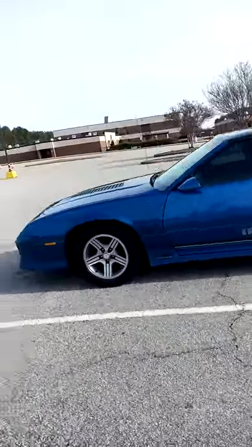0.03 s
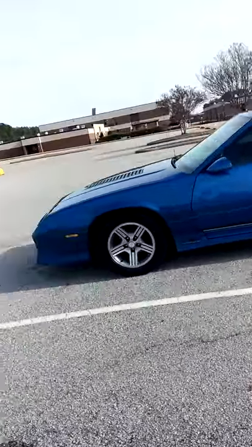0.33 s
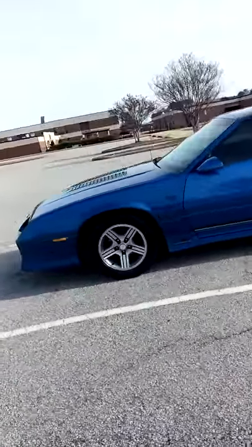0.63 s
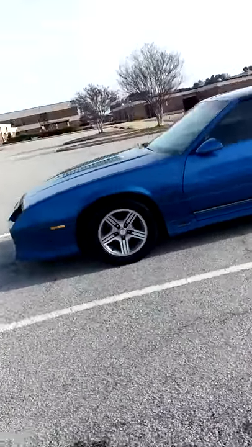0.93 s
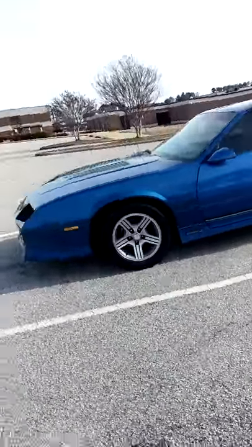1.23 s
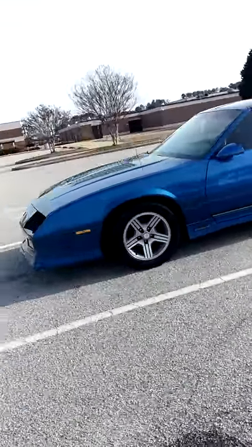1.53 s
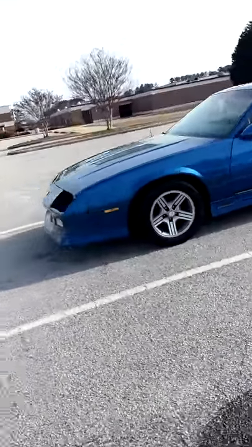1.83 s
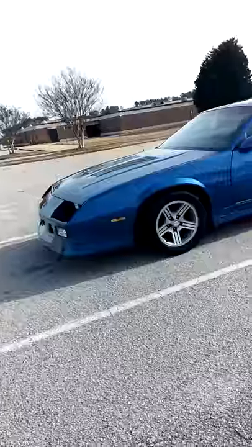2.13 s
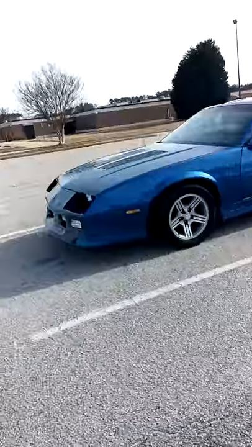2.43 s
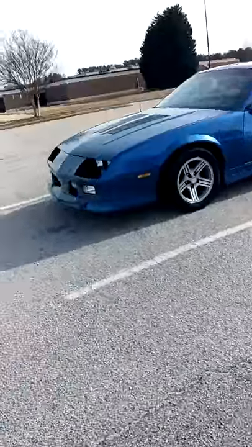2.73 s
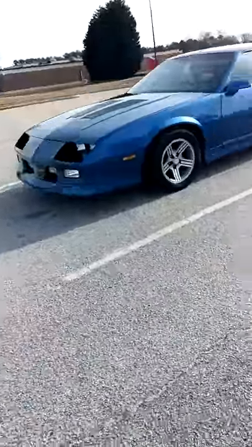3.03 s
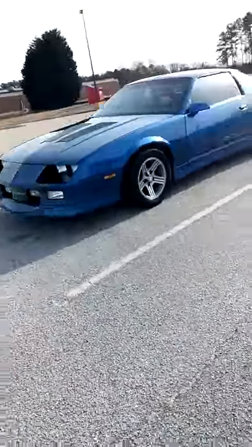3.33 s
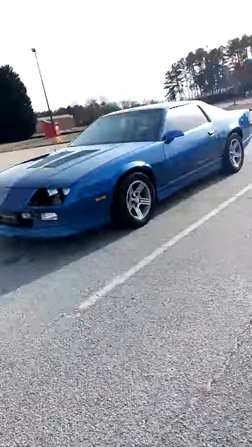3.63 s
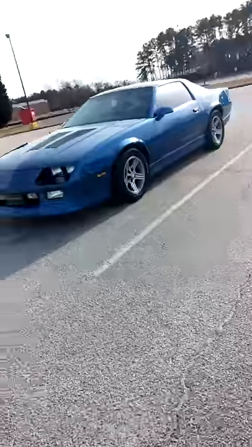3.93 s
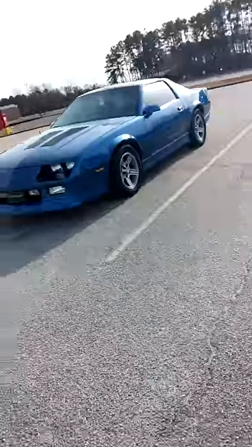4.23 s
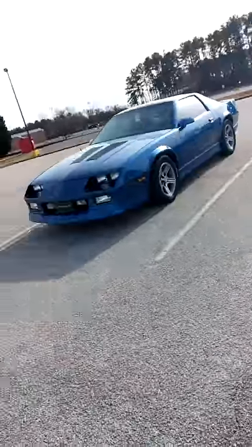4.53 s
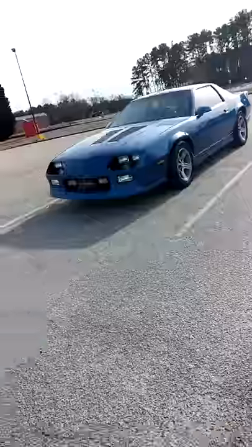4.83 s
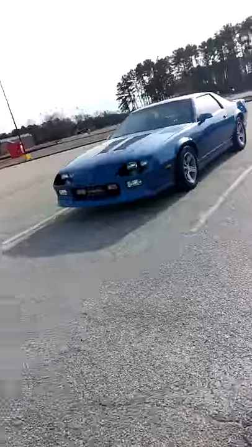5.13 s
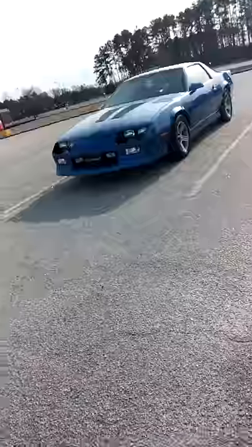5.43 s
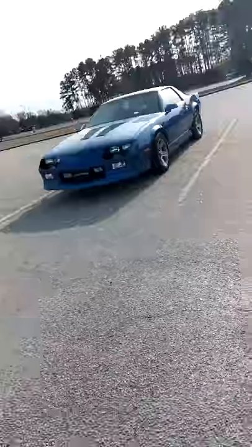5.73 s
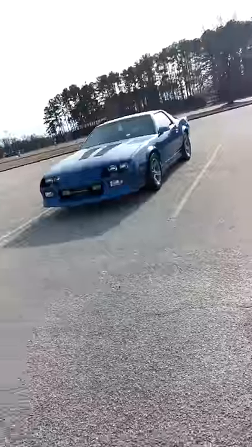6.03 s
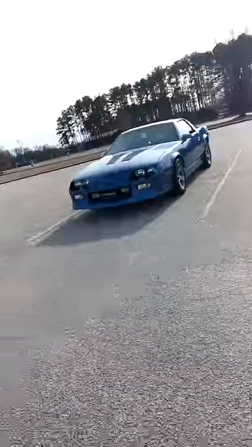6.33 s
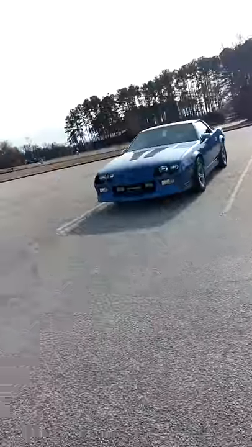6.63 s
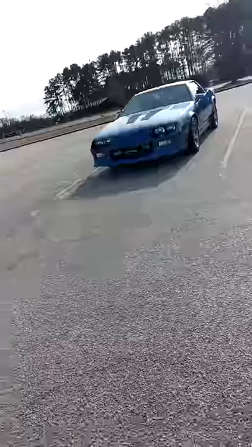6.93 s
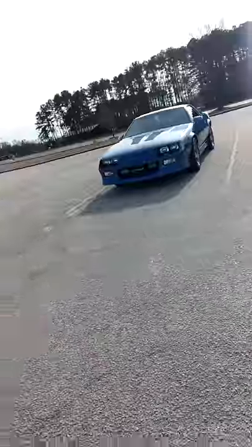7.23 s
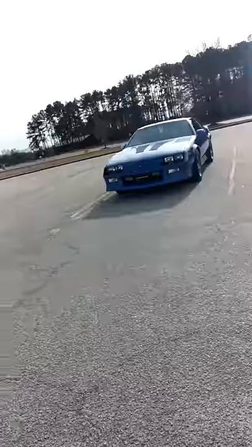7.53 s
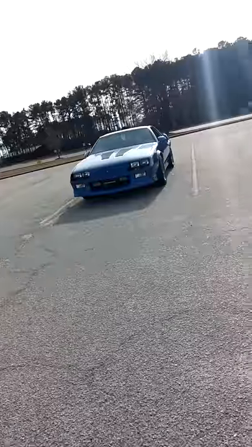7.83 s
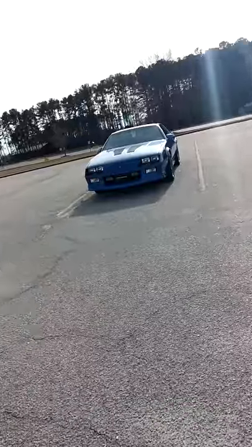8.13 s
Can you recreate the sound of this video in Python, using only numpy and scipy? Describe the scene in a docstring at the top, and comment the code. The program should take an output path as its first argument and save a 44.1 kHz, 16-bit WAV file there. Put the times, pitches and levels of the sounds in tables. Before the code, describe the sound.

The loping idle of a V8 shifts from a bark to a lower throb, with faint belt chirps and light gritty footsteps.

```python
"""A V8 idles lumpily in an open parking lot, heard from its side: puffs of gas ring the two loud exhaust
pipes, while the engine bay whirrs, ticks and chirps. Someone with a phone walks toward the nose, shoes
scuffing grit on the asphalt, and each pipe tone swells and fades with the angle. The engine sags in the
first two seconds, and halfway through the bark gives way to a lower throb. From about six seconds the
speed recovers; near the end the hand bumps the phone, now well out in front of the car."""
import sys
import numpy as np
from scipy import signal
from scipy.fft import rfft, irfft, next_fast_len
from scipy.io import wavfile
from scipy.ndimage import uniform_filter1d, map_coordinates

SR = 44100
rng = np.random.default_rng(int(sys.argv[2]) if len(sys.argv) > 2 else 0)


def persist_wave(psi):
    """Save psi, clipped to +-1, as 16-bit WAV."""
    counts = np.round(np.clip(psi, -1, 1) * 32767).astype(np.int16)
    wavfile.write(sys.argv[1], SR, np.atleast_2d(counts).T)


N = 369558
TIME = np.arange(N) / SR

# Engine speed. Each row: time in seconds, crankshaft turns a minute.
ENGINE_RPM = [(0.0, 941.7), (0.43, 931.6), (1.03, 861.3), (1.32, 854.0), (1.93, 787.9), (2.53, 803.6),
              (2.76, 788.9), (3.7, 780.8), (4.19, 795.0), (4.45, 776.0), (5.08, 790.6), (6.11, 829.6),
              (6.34, 863.8), (7.65, 921.0), (8.38, 925.5)]
# The walk. Each row: time in seconds, bearing (angle off the car's nose) in degrees, distance in metres.
WALK = [(0, 94, 4.2), (.6, 78.8, 4), (2.4, 67, 4.4), (3.5, 51, 3.75), (4.7, 39.1, 5.1), (6, 25.1, 5.3),
        (8.38, 7.2, 8.8)]
# The exhaust sounds different from five views: side, wing, corner, headlamp and nose.
# Each row: bearing where one view gives way to the next, width of the blend, both in degrees.
VIEW_EDGES = [(72.43, 1.1), (60.64, 2.2), (42.5, 1.8), (24.94, 1.4)]
# Puff strength. Each row is a view: eight cylinders in firing order.
PUFF_STRENGTHS = [
    [.02, 0.8, 0.55, 1.15, 0.044, 1.2, 1.88, 1.6],
    [1.15, 0.13, 0.64, 0.6, .02, 0.83, 1.63, 1.64],
    [0.5, 0.88, 1.35, 1.5, 1.23, 0.58, 0.51, 0.61],
    [0.77, 0.54, .45, 0.54, .83, 1.38, 1.3, 1.1],
    [1.4, 1, 0.14, 0.73, .02, 1.45, 1.4, 1.04],
]
# Unequal pipe runs shift the puffs. Each row is a cylinder: its bank's place in car widths, shift in ms.
PIPE_RUNS = [(-.5, .3), (.5, 1.1), (-.5, -.5), (-.5, .2), (.5, -.2), (-.5, .25), (.5, -.5), (.5, -.9)]
# When puffs arrive. Each row is a view: shift in ms, lag between the two cylinder banks in ms.
ARRIVALS = [(-15.3, -4.6), (-11.1, .3), (-11.3, -5.1), (-8.2, .55), (3.9, 8.75)]
# The drone of the uneven banks. Each row is a tone: level in dB at each view.
DRONE_LEVELS = {"low drone": (-24, -31.5, -29, -36, -28), "main drone": (-17, -17, -23, -22.5, -25.5),
                "high drone": (-24.5, -25.5, -24.5, -25.5, -21.5)}
# Pipe tones. Each row: pitch in Hz, width in Hz, share of swirling gas, swell in dB,
# share of the engine cycle where the swell peaks, then level in dB at each view.
PIPE_TONES = {"throb": (117, 44, 1.1, 6.5, 0.62, -28, -28, -21, -20, -17.5),
              "bark": (178, 23.5, 0.3, 7, 0.51, -13, -11.5, -20, -21, -25.5),
              "burble": (197, 10, 0.8, 0.5, -4.5, -21.5, -19, -25, -32, -33.5),
              "gurgle": (237.5, 24, 1.5, -0.5, 1, -39, -46, -35.5, -29.5, -53),
              "growl": (328.5, 35, 1.6, 6.5, 0.59, -26.5, -35.5, -34.5, -37, -39),
              "rasp": (398.5, 23.5, 1.3, 7.5, 0.66, -30.5, -31, -36, -36.5, -48.5),
              "snarl": (479, 105, 1.5, 5, 1.3, -37.5, -49, -38.5, -45.5, -59)}
# The lope, a swell once a cycle. Each row is a view: share of the swell, shift of its peak in cycles.
LOPE = [(1.08, -0.21), (1.15, -0.12), (0.44, 0.39), (0.62, -0.21), (1.04, -0.14)]
# The two tailpipes add up or cancel. Each row: tone, bearing and half width in degrees, change in dB.
TAILPIPE_LOBES = [("high drone", 75, 4.2, 4.4), ("throb", 56.2, 6.1, -6), ("bark", 60.6, 10.5, -8),
                  ("bark", 26, 2.4, -5.5), ("burble", 85, 7.2, -13), ("burble", 62.2, 6, -8),
                  ("burble", 29, 1.2, -6), ("growl", 74, 4.6, 2.2), ("growl", 39, 3.6, 8.9),
                  ("growl", 26, 2.4, -19), ("growl", 16.6, 3.7, 7.4), ("growl", 57, 3.7, 3.4),
                  ("growl", 6, 3.7, -4.5), ("rasp", 75.2, 2.5, -7.5), ("rasp", 57.4, 6.1, 4.5),
                  ("rasp", 28.2, 4.5, -10.5), ("rasp", 16.1, 1.7, 15)]
# Engine bay resonances, each beamed one way. Each row: pitch in Hz, width in Hz, boost in dB,
# bearing of the beam in degrees, extra dB there.
BAY_RESONANCES = [(567, 34, 5.5, 50, 7.5), (761.3, 46, 11, 23, 3.5), (970, 54, 1.5, 89.7, 22),
                  (1065, 100, 4, 84.5, 11), (1174, 38, 6.5, 57.5, 13.5), (1358, 91, 8, 50.5, 8),
                  (1450, 64, -0.5, 70, 8.5), (1472, 77, 9, 43.5, 11.5), (1897, 420, 5, 32, 4),
                  (2620, 340, 1.5, 35, 6), (2743, 170, 5, 85.1, 13), (2960, 270, 0.5, 65.1, 10),
                  (4070, 260, 3.5, 70.5, 9.5), (5120, 590, -1, 14, -7)]
# The bay's four noises, low to high. Each row: frequency in Hz, relative level in dB.
MOAN_SPECTRUM = [(400, -20), (510, -12), (600, -2), (700, 1), (800, -3.5), (900, -6.5), (1050, -38),
                 (1500, -79)]
WHIRR_SPECTRUM = [(700, -36), (900, 15.5), (1000, 15), (1300, 12), (1480, 4), (1580, -24), (2400, -52)]
HISS_SPECTRUM = [(1000, -70), (1600, 5.5), (2300, 4.5), (3300, 2.5), (4500, 1.5), (5500, 1.5), (6400, -22),
                 (8500, -21)]
AIR_SPECTRUM = [(3410, -35), (5800, -0.5), (8150, -3), (11300, -15), (13900, -19), (15800, -42)]
# How alike the bay sounds left and right. Each row: frequency in Hz, likeness from 0 to 1.
STEREO_LIKENESS = [(60, 0.89), (130, 0.84), (290, 0.49), (640, 0.91), (1410, 0.72), (3100, 0.54),
                   (6820, 0.1), (15000, 0.01)]
# Loudness of moan, whirr and tappets. Each row: time in seconds, base level in dB.
MOAN_LEVEL = [(0, -31), (.8, -32.5), (1.35, -29.5), (1.8, -37), (2.1, -31.5), (2.65, -37.5), (3.35, -31),
              (3.7, -36.5), (4.1, -31.5), (5, -35.5), (5.6, -31), (6.2, -37), (8.38, -40.5)]
WHIRR_LEVEL = [(0, -30), (.25, -39.5), (.55, -27), (.8, -36), (1.3, -31), (1.85, -35), (2.3, -30.5),
               (4, -32), (4.3, -37.5), (4.65, -33), (5.2, -39.5), (6.5, -38), (7, -41), (8.38, -41.5)]
TAPPET_LEVEL = [(4.5, -45), (6.3, -49), (6.5, -39.5), (6.9, -57), (7.25, -38.5), (7.7, -39), (7.95, -54),
                (8.15, -42), (8.38, -53)]
# Brief swells of midrange noise; the one near 6.5 seconds is a shoe scuff.
# Each row: time in seconds, boost in dB, half length in seconds.
MIDRANGE_SWELLS = [(0.576, 4, 0.04), (1.16, 3, 0.031), (1.32, 6, 0.0075), (1.455, 8, 0.04),
                   (3.412, 10, 0.0039), (4.313, 1, 0.0046), (5.68, 3, 0.006), (6.277, 3, .03),
                   (6.506, 6, .05)]
# Each valve's squeak in firing order, in dB above the tappets' base level.
VALVES_DB = [2, 0, -10, -9.5, -14, 0.5, -3.5, -14]
# Short rough chirps, mostly from the belt and pulleys; the four between 5.5 and 6 seconds are grit crunching
# under the shoes. # Each row: time in seconds, pitch in Hz, level in dB.
CHIRPS = [(0.09, 2800, -33), (0.099, 4480, -34), (0.782, 2720, -35.5), (1.0, 4100, -39),
          (1.105, 4100, -32.5), (1.146, 2900, -34), (1.43, 4120, -34), (1.562, 4220, -33),
          (1.575, 2850, -43), (1.873, 5050, -35.5), (2.038, 2980, -33), (2.381, 2950, -39),
          (2.147, 4040, -33.5), (2.646, 2780, -30.5), (2.775, 4070, -32.5), (2.834, 5570, -35.5),
          (4.513, 6000, -37.5), (4.835, 1450, -33), (4.865, 1370, -30.5), (5.57, 2800, -47),
          (5.65, 2860, -42.5), (5.801, 3930, -39), (5.95, 3970, -37.5), (6.153, 6340, -38.5),
          (6.372, 3620, -37), (7.001, 4700, -41)]
# Shoes on grit. Each row: start in seconds, level in dB, pitch in Hz, seconds to fade by 20 dB.
SCUFFS = [(0.391, -35, 7160, 0.014), (1.297, -25, 1280, 0.034), (2.189, -40.5, 6760, 0.41),
          (3.12, -34.5, 6760, 0.075), (3.171, -34, 5830, 0.1), (3.225, -31, 5900, .012),
          (3.285, -40, 7000, 0.027), (3.602, -20, 5900, 0.0089), (3.617, -22, 7400, 0.0015),
          (4.964, -37.5, 6900, 0.034), (5.42, -36.5, 6650, 0.039), (5.714, -32.5, 5970, 0.028),
          (5.809, -36, 5000, .025), (6.434, -44.5, 1500, 0.48), (6.483, -40, 4550, 0.081),
          (7.151, -44, 6950, 0.0051), (7.841, -29, 2660, 0.032), (7.875, -32.5, 3520, 0.03),
          (8.297, -28.5, 8500, 0.0029), (8.348, -21.5, 8000, 0.0024)]
# Bumps on the phone. Each row: time in seconds, level in dB, pitch in Hz.
BUMPS = [(6.294, -19, 360), (7.921, -9.5, 220), (7.926, -12, 310), (7.936, -24, 286), (7.937, -21.5, 518)]
# The phone turns in the hand. Each row: time in seconds, left minus right in dB (used less its average).
PHONE_TURN = [(0, 5), (.65, 6.5), (1.6, 4.5), (2.2, 6.5), (4.2, 7), (7.9, 6), (8.38, 4.5)]
# The two microphones hear unequally. Each row: frequency in Hz, left minus right in dB.
MIC_BALANCE = [(60, 2.5), (110, 5.5), (200, 4), (380, 2.5), (700, 2), (1290, 5), (2380, 2), (4400, 5),
               (8120, 4.5), (15000, -12.5)]

CYLINDERS = 8
DRONE_ORDERS = (8, 11, 13)  # vibrations per engine cycle
NEAR_M, HISS_DB, AIR_DB = 3.62, -36.5, -44.5  # base levels at this distance
BEAM_DEGREES, DRIFT_DB = 7.3, 3.5  # half width of a bay beam; slow wax and wane of narrow bands
TOP_HZ = 15850


def amp(db):
    """Turn decibels into a gain."""
    return np.exp(np.asarray(db) * (np.log(10) / 20))


def unit(x):
    """Scale to an average (rms) level of 1."""
    return x / np.sqrt(np.mean(x ** 2) + 1e-20)


def smooth(x, size):
    """Take a running average twice."""
    return uniform_filter1d(uniform_filter1d(x, size), size)


def steady(x):
    """Hold the level at 1 over a few engine cycles, keeping the lope within them."""
    return x / np.sqrt(np.abs(smooth(x * x, SR // 4)) + 1e-20)


def along(points, hz):
    """Join (Hz, value) points on a log frequency axis."""
    freqs, values = np.transpose(points)
    return np.interp(np.log(hz + 1), np.log(freqs + 1), values)


def curves(rows, at=TIME):
    """Join each column after the time with straight lines."""
    times, *columns = np.transpose(rows)
    return np.array([np.interp(at, times, column) for column in columns])


def wobble(rate):
    """A smooth curve through `rate` random points a second."""
    return map_coordinates(rng.standard_normal(int(N * rate / SR) + 4), [TIME * rate])


def filtered(x, response):
    """Filter x by a response given as a function of frequency."""
    size = next_fast_len(N + SR // 2, True)
    return irfft(rfft(x, size) * response(np.fft.rfftfreq(size, 1 / SR)), size)[..., :N]


def resonance(f, hz, width):
    """The response of something that rings at hz, with height 1."""
    return 1j * f * width / (hz * hz - f * f + 1j * f * width)


def bell(f, hz, width):
    """A peak of height 1 around hz."""
    return 1 / (1 + (2 * (f - hz) / width) ** 2)


def lobe(x, centre, half, db):
    """A rounded rise or dip in dB around one angle or moment."""
    return db * np.exp(-((x - centre) / half) ** 2)


def views(bearing):
    """How much of each view is heard at a bearing; the shares add up to 1."""
    passed = [.5 + .5 * np.tanh((edge - bearing) / blend) for edge, blend in VIEW_EDGES]
    return -np.diff(passed, axis=0, prepend=1, append=0)


def tone_gain(tone, view_db, bearing):
    """Gain of one exhaust tone: its level in this view plus the tailpipes' lobes."""
    lobes_db = sum(lobe(bearing, *row) for name, *row in TAILPIPE_LOBES if name == tone)
    return amp(np.dot(view_db, views(bearing)) + lobes_db)


def firings(cycle, scatter, jitter_ms):
    """Each cylinder fires one puff per cycle, no two quite alike."""
    firing = np.arange(int(cycle[-1] * CYLINDERS))
    cylinder = firing % CYLINDERS
    size_luck, time_luck = rng.standard_normal((len(firing), 2)).T
    fired_s = np.interp(firing / CYLINDERS, cycle, TIME)
    view = views(curves(WALK, fired_s)[0])
    strength = (np.transpose(PUFF_STRENGTHS) @ view)[cylinder, firing] + scatter * size_luck
    bank, run_ms = np.array(PIPE_RUNS)[cylinder].T
    view_ms, lag_ms = np.transpose(ARRIVALS) @ view
    heard_s = fired_s + (run_ms + view_ms + bank * lag_ms + jitter_ms * time_luck) / 1000
    return np.bincount(np.clip(heard_s * SR, 0, N - 1).astype(int), strength, N)


def pipe(x, hz, width):
    """Pipe and muffler ring at the same pitch, so the resonance acts twice."""
    return filtered(x, lambda f: resonance(f, hz, width) ** 2)


def in_step(x, cycle, order):
    """A clean tone of level 1 that vibrates `order` times a cycle, in step with x."""
    spin = np.exp(2j * np.pi * order * cycle)
    phase = smooth(x / spin, SR // 2)
    return np.sqrt(2) * np.real(spin * phase) / np.abs(phase)


def drone(puffs, cycle, bearing):
    """The uneven banks hum three clean tones over the pipes' lowest boom."""
    boom = pipe(puffs, hz=72.7, width=19)
    tones = sum(tone_gain(name, view_db, bearing) * in_step(boom, cycle, order)
                for (name, view_db), order in zip(DRONE_LEVELS.items(), DRONE_ORDERS))
    return tones + amp(-29.5) * steady(boom)


def exhaust(cycle, bearing):
    """Puffs, each trailed by a little swirling gas, ring the pipes."""
    puffs = firings(cycle, scatter=0.17, jitter_ms=0.094)
    trails = signal.lfilter([1], [1, -np.exp(-1 / (0.01 * SR))], puffs)  # 10 ms decay
    gas = unit(trails * rng.standard_normal(N))
    out = drone(puffs, cycle, bearing)
    share, late = np.transpose(LOPE)
    swing = (share * np.exp(-2j * np.pi * late)) @ views(bearing) * np.exp(2j * np.pi * cycle)
    for name, (hz, width, gas_share, swell_db, peak, *view_db) in PIPE_TONES.items():
        lope = amp(swell_db * np.real(swing * np.exp(-2j * np.pi * peak)))
        ring = pipe(unit(puffs) + gas_share * gas, hz, width)
        out += tone_gain(name, view_db, bearing) * steady(lope * ring)
    # the mufflers let little treble through
    return filtered(out, lambda f: amp(along([(430, 1), (510, -2.0), (900, -34)], f)))


def bay_noise(spectrum, bearing, patchy_db):
    """Patchy stereo noise of level 1, coloured by the bay's resonances as heard from the bearing."""
    freqs, times, cells = signal.stft(rng.standard_normal((2, N)), SR, nperseg=1024)

    def patches(bands, frames):
        field = uniform_filter1d(rng.standard_normal(cells.shape[1:]), bands, axis=0)
        return unit(uniform_filter1d(field, frames, axis=1))

    def colour(f):
        peaks_db = sum(db * bell(f, hz, width) for hz, width, db, *_ in BAY_RESONANCES)
        spread = np.arccos(np.clip(along(STEREO_LIKENESS, f), 0, 1)) / 2
        return amp(along(spectrum, f) + peaks_db) * [np.cos(spread), np.sin(spread)]

    heard_from = np.interp(times, TIME, bearing)
    beams_db = sum(np.outer(bell(freqs, hz, width), lobe(heard_from, aim, BEAM_DEGREES, db))
                   for hz, width, _, aim, db in BAY_RESONANCES)
    gain_db = beams_db + patchy_db * patches(7, 4) + DRIFT_DB * patches(2, 30)
    pair = signal.istft(cells * amp(gain_db), nperseg=1024)[1][:, :N]
    mid, side = filtered(pair, colour)
    return unit(np.array([mid + side, mid - side]))


def engine_bay(cycle, bearing, distance):
    """Fan, belt and valves: noise that swells once a cycle, ticks with the valves and fades far away."""
    far_db = 20 * np.log10(NEAR_M / distance)
    lope = lambda peak: np.cos(2 * np.pi * (cycle - peak))
    stroke = np.floor(cycle * CYLINDERS).astype(int)
    ticks = np.exp(-(cycle * CYLINDERS - stroke) / 0.74) * rng.exponential(1, stroke[-1] + 1)[stroke]
    ticks = np.minimum(ticks, 2) - np.mean(ticks)
    swell_db = sum(lobe(TIME, when, half, db) for when, db, half in MIDRANGE_SWELLS)  # one is a scuff
    puff_db = lobe(cycle % 1, centre=0.834, half=0.086, db=3.7) + 2.1 * lope(1.0) - 1
    moan_db = curves(MOAN_LEVEL) + swell_db + puff_db + ticks
    moan = amp(moan_db) * steady(bay_noise(MOAN_SPECTRUM, bearing, patchy_db=3))
    whirr_db = curves(WHIRR_LEVEL) + swell_db + 0.44 * lope(0.53) + 2 * ticks
    whirr = amp(whirr_db) * steady(bay_noise(WHIRR_SPECTRUM, bearing, patchy_db=3.5))
    # the hiss escapes through two openings
    grille_db = lobe(bearing, centre=29, half=8.8, db=1)
    wheel_arch_db = lobe(bearing, centre=64.6, half=7.8, db=2.1)
    hiss_db = HISS_DB + far_db + grille_db + wheel_arch_db
    hiss_db += 0.3 * swell_db + 0.43 * lope(0.72) + 2.75 * ticks
    hiss = amp(hiss_db) * bay_noise(HISS_SPECTRUM, bearing, patchy_db=3)
    air_db = AIR_DB + far_db + 1.7 * wobble(22) + 3.2 * ticks
    air = amp(air_db) * bay_noise(AIR_SPECTRUM, bearing, patchy_db=1.5)
    return moan + whirr + hiss + air


def tappets(cycle, hz, width_hz, decay_s, octaves):
    """Each valve stroke squeaks softly through the grille, varying in pitch and strength."""
    stroke = np.floor(cycle * CYLINDERS).astype(int)
    age = (TIME - TIME[np.searchsorted(stroke, stroke)]) / decay_s
    size, pitch = rng.standard_normal((stroke[-1] + 1, 2))[stroke].T
    strength_db = np.array(VALVES_DB)[stroke % CYLINDERS] + 3 * np.clip(size, -2, .6)
    flutter = unit(filtered(rng.standard_normal((2, N)), lambda f: bell(f, 0, width_hz)))
    ring = unit(flutter * np.sin(2 * np.pi * np.cumsum(hz * 2 ** (octaves * pitch)) / SR))
    return amp(curves(TAPPET_LEVEL) + strength_db) * age * np.exp(1 - age) * ring


def lot_rumble():
    """The low wash of the open lot, nearly alike left and right."""
    hz_and_db = [(10, -18), (25, -6.5), (40, -7.5), (90, -7), (250, -8.5), (600, -43), (2000, -85)]
    mid, side = filtered(rng.standard_normal((2, N)), lambda f: amp(along(hz_and_db, f)))
    return amp(-30 + 1.6 * wobble(3)) * unit(np.array([mid + .2 * side, mid - .2 * side]))


def loose_sand(per_second, spread_db):
    """Loose sand ticks at random under the soles."""
    chance = rng.random((int(per_second * N / SR), 3))
    ticks = np.zeros((2, N))
    starts = (chance[:, 0] * (N - 1)).astype(int)
    ticks[:, starts] = amp(spread_db * chance[:, 1:].T ** 3)
    return unit(filtered(ticks, lambda f: resonance(f, hz=7100, width=5000) ** 2))


def short_chirps(half_s, width_share, faint_per_s, faint_hz, faint_db):
    """Short, rough chirps: the listed ones (mostly belt and pulleys, a few grit under the shoes), plus faint
    belt chirps at random."""
    out, t = np.zeros((2, N + SR)), np.arange(-SR // 20, SR // 20) / SR
    f = np.fft.rfftfreq(len(t), 1 / SR)
    chance = rng.standard_normal((int(faint_per_s * N / SR), 2))
    times = (np.arange(len(chance)) + rng.random(len(chance))) / faint_per_s
    faint = [(when, faint_hz * 2 ** (0.21 * pitch), faint_db - 0.5 * softer)
             for when, (pitch, softer) in zip(times, chance)]
    for when, hz, db in CHIRPS + faint:
        noise = rng.standard_normal((2, len(t)))
        mid, side = irfft(rfft(noise) * bell(f, hz, width_share * hz), len(t))
        swell = np.exp(-(t / half_s) ** 2)
        burst = unit(np.array([mid + .5 * side, mid - .5 * side]) * swell) * np.sqrt(np.mean(swell ** 2))
        start = max(round((when + t[0]) * SR), 0)
        out[:, start:][:, :len(t)] += amp(db) * burst
    return out[:, :N]


def shoe_scuffs():
    """Grit crunches under the shoes: fading noise whose level jumps every millisecond."""
    out, t = np.zeros((2, N + SR)), np.arange(SR // 4) / SR
    f = np.fft.rfftfreq(len(t), 1 / SR)
    for start, db, hz, fade_s in SCUFFS:
        noise = rng.standard_normal((2, len(t)))
        grains = noise * amp(4 * np.repeat(rng.standard_normal(len(t)), SR // 1000)[:len(t)])
        crunch = unit(irfft(rfft(grains) * resonance(f, hz, 0.6 * hz) ** 2, len(t)))
        out[:, round(start * SR):][:, :len(t)] += amp(db - 20 * t / fade_s) * crunch
    return out[:, :N]


def hand_bumps(half_s):
    """The hand bumps the phone, each time with a short, soft thud."""
    return sum(amp(db) * np.sin(2 * np.pi * hz * (TIME - when)) * np.exp(-((TIME - when) / half_s) ** 2)
               for when, db, hz in BUMPS)


def scene():
    """Mix the car, the walker and the lot; the walk sets what is heard of the car."""
    cycle = np.cumsum(curves(ENGINE_RPM)[0] / 120) / SR  # one cycle is two crankshaft turns
    bearing, distance = curves(WALK)
    turn_db = curves(PHONE_TURN)[0]
    left_right = amp((turn_db - turn_db.mean()) * np.array([[.5], [-.5]]))
    car = exhaust(cycle, bearing) + engine_bay(cycle, bearing, distance)
    car += short_chirps(half_s=0.017, width_share=0.082, faint_per_s=2, faint_hz=4680, faint_db=-43)
    car += tappets(cycle, hz=5190, width_hz=580, decay_s=0.0044, octaves=.09)
    sand = amp(-70) * loose_sand(per_second=30, spread_db=12)
    return car * left_right + sand + shoe_scuffs() + hand_bumps(half_s=0.0029) + lot_rumble()


def record(dry):
    """The phone's two microphones hear unequally; peaks are rounded off and the top treble is cut."""
    def balance(f):
        gains = amp(along(MIC_BALANCE, f) * np.array([[.5], [-.5]]))
        return gains / gains.mean(axis=0)
    heard = filtered(dry, balance)
    rounded = heard / (1 + np.abs(heard) ** 8) ** (1 / 8)
    return filtered(rounded, lambda f: f < TOP_HZ)


dry = scene()
out = record(dry)
persist_wave(out)
```